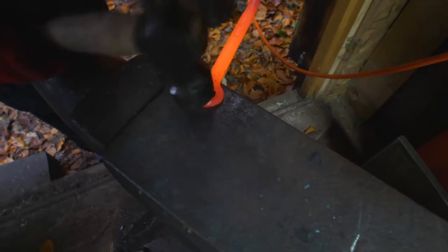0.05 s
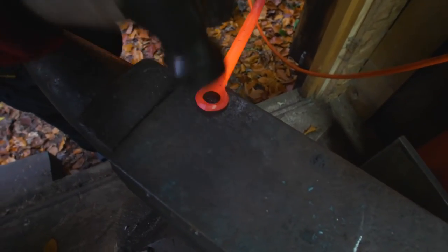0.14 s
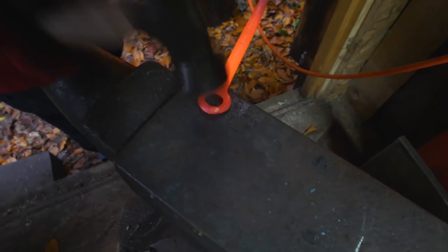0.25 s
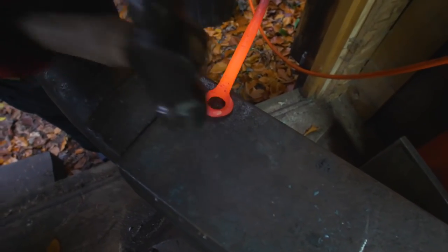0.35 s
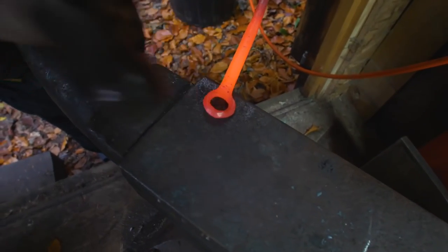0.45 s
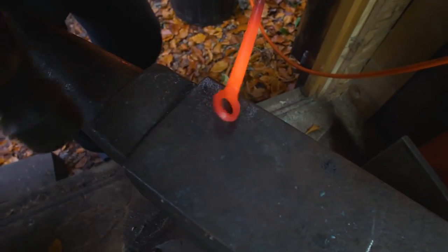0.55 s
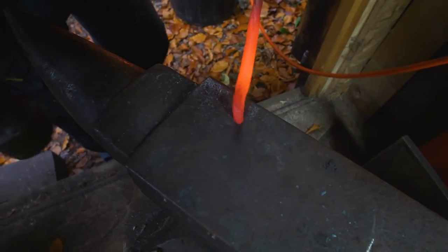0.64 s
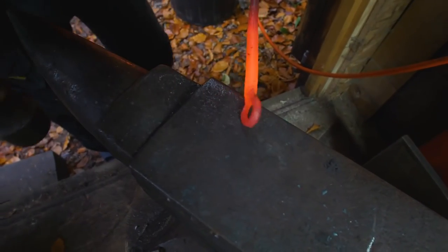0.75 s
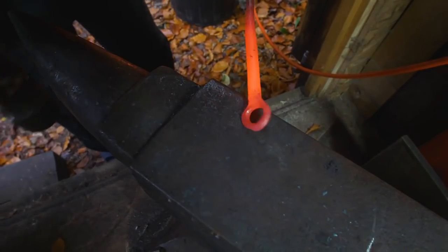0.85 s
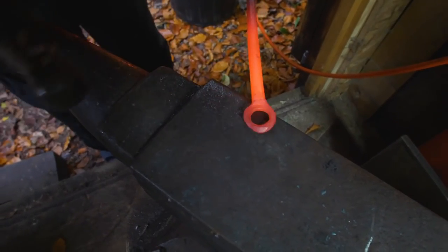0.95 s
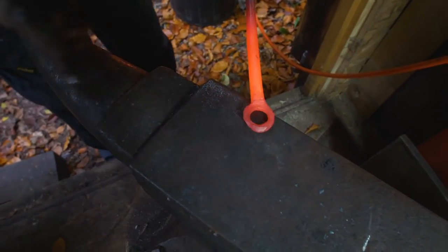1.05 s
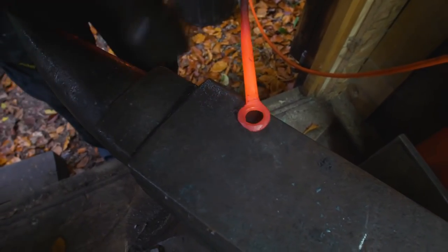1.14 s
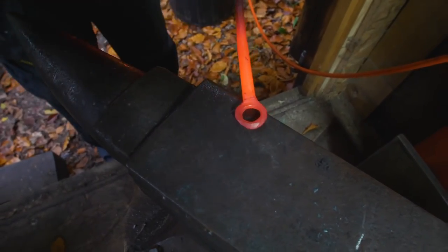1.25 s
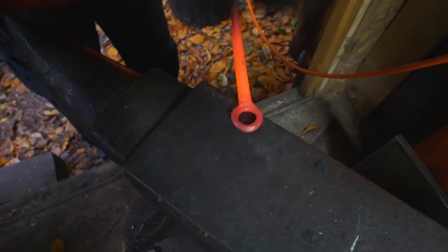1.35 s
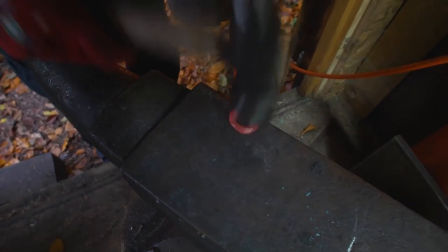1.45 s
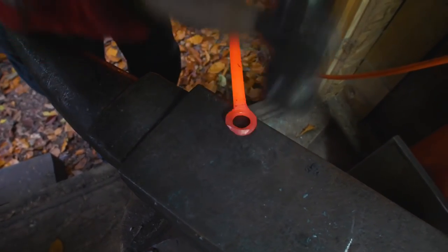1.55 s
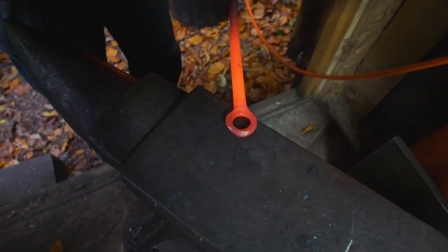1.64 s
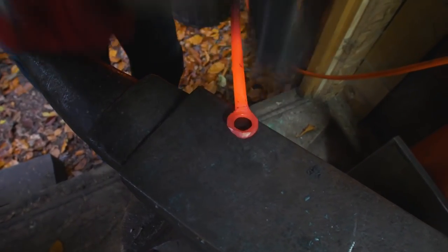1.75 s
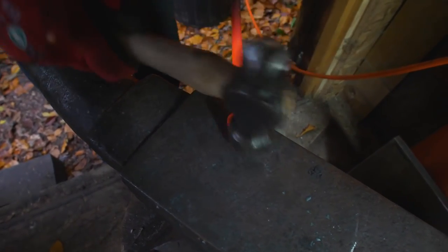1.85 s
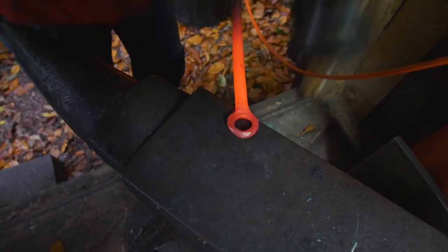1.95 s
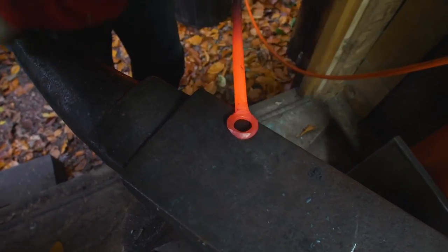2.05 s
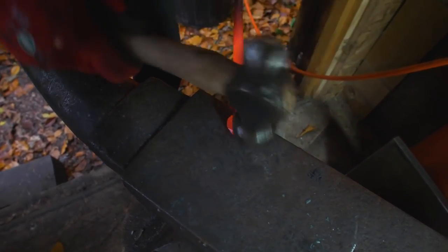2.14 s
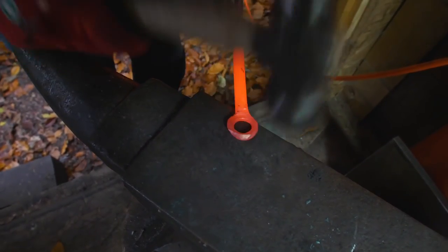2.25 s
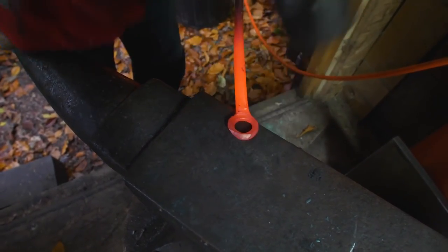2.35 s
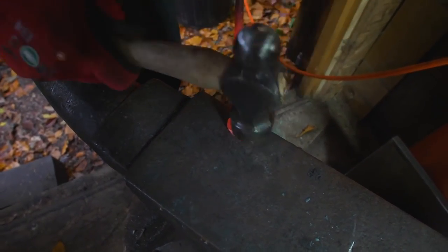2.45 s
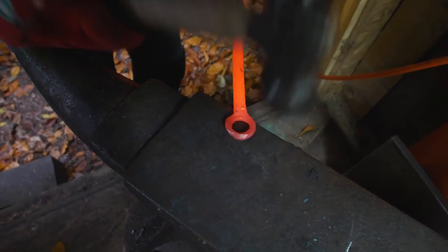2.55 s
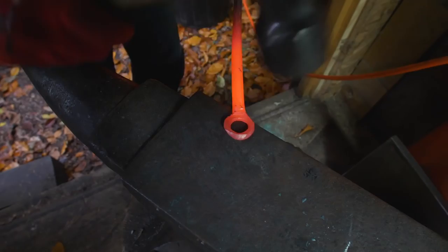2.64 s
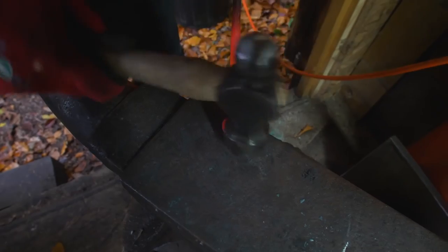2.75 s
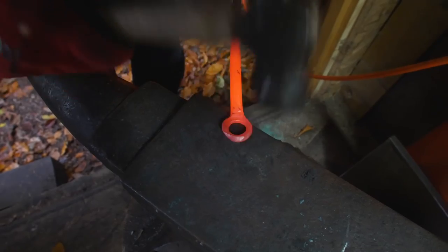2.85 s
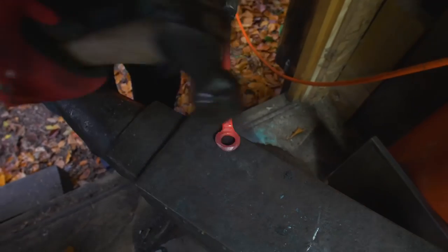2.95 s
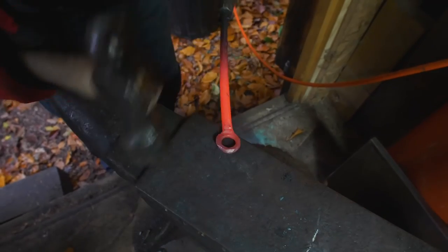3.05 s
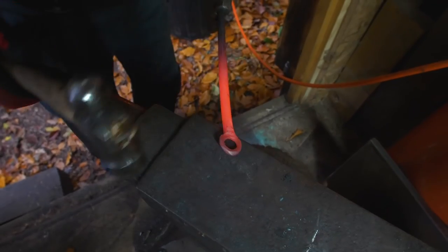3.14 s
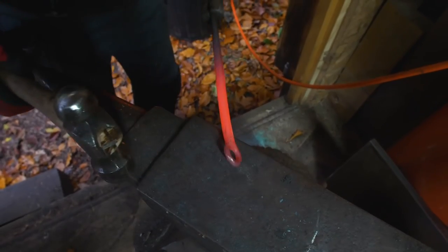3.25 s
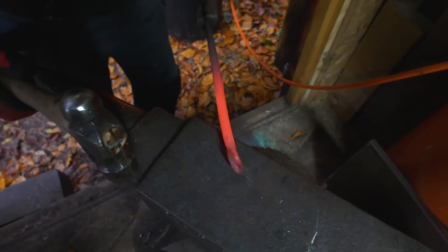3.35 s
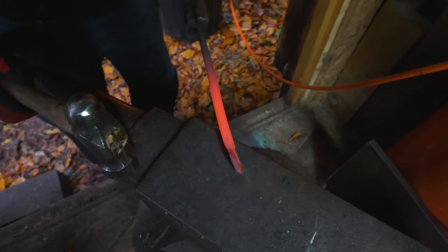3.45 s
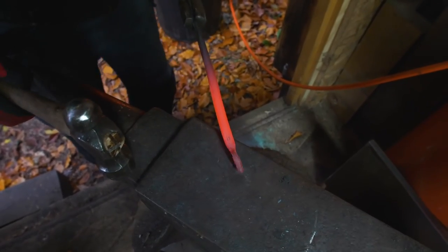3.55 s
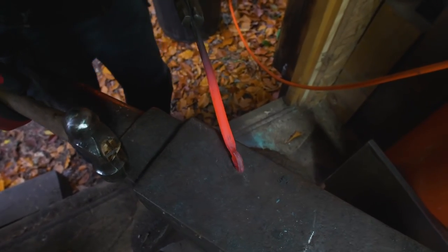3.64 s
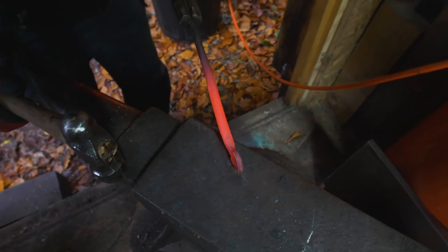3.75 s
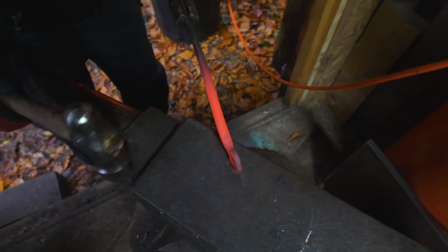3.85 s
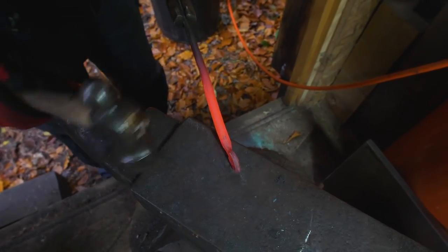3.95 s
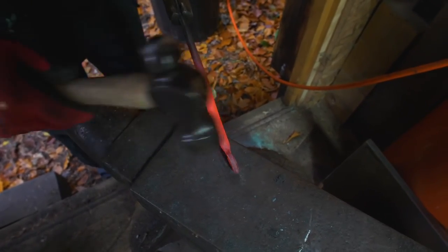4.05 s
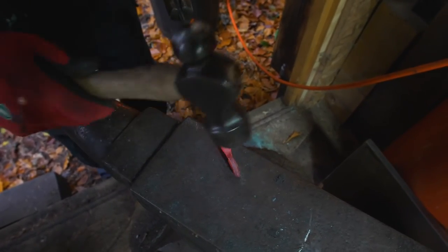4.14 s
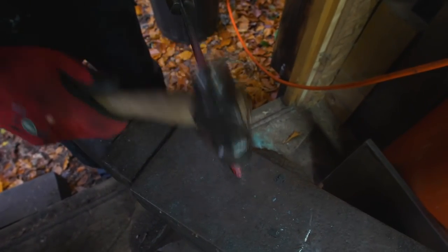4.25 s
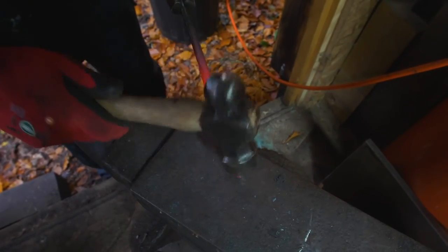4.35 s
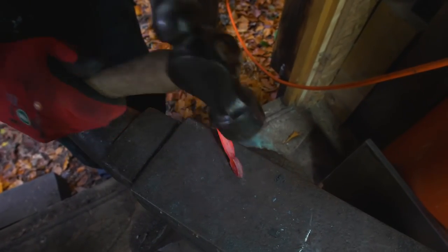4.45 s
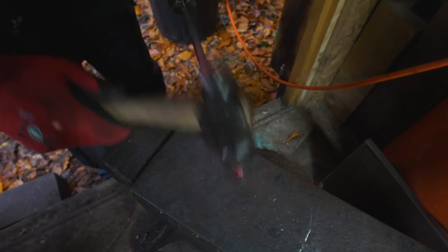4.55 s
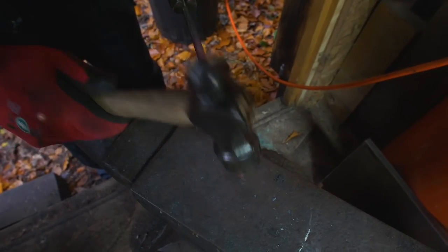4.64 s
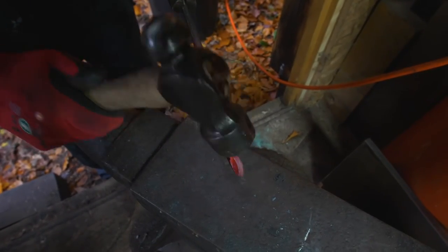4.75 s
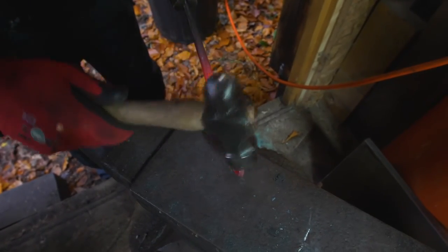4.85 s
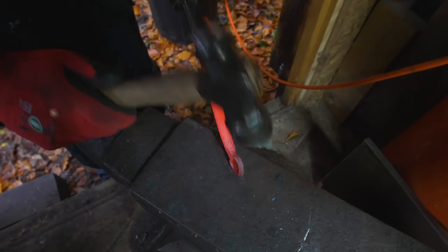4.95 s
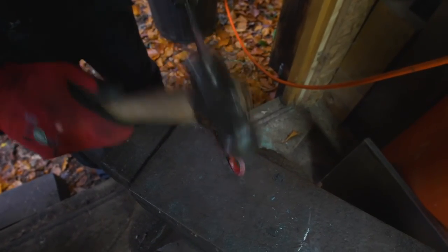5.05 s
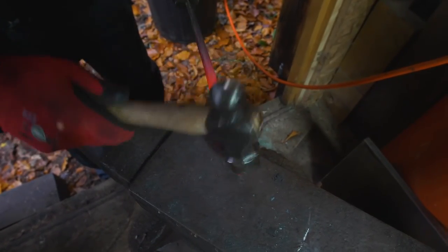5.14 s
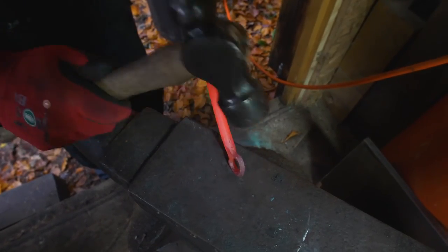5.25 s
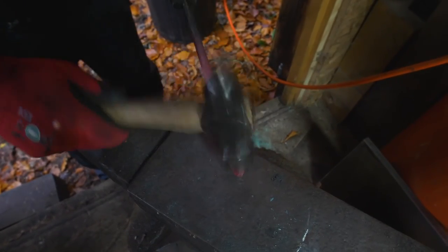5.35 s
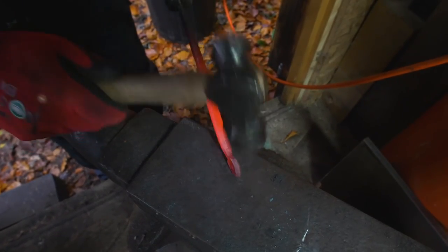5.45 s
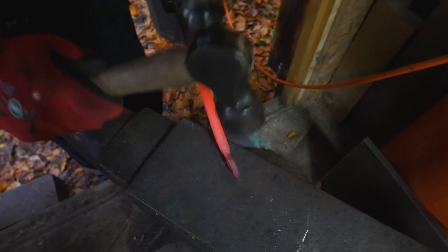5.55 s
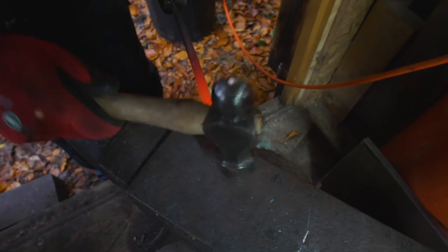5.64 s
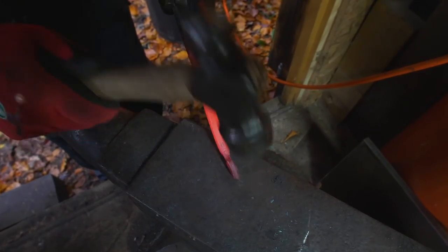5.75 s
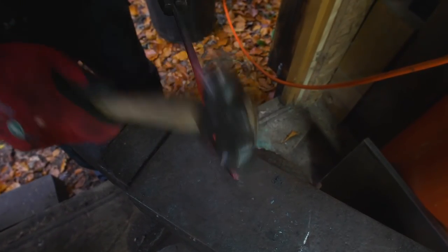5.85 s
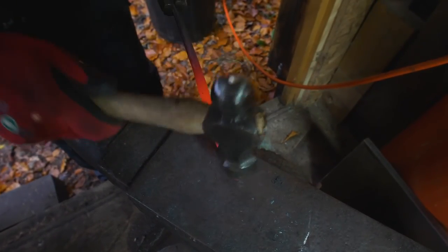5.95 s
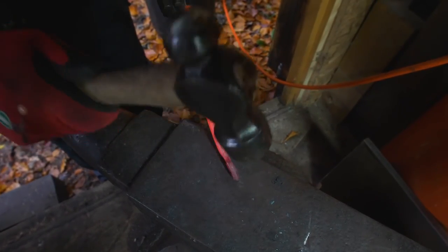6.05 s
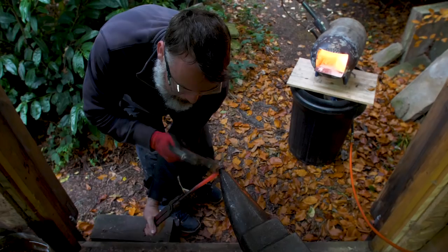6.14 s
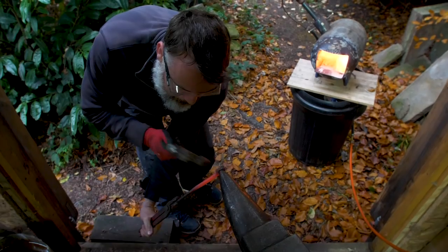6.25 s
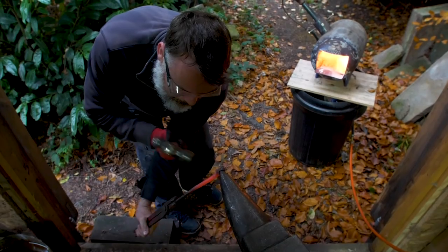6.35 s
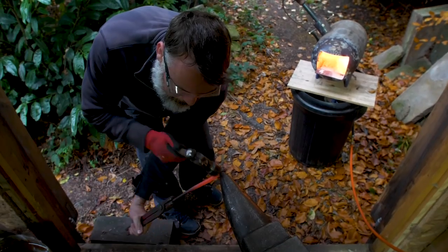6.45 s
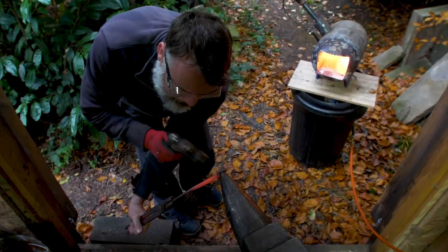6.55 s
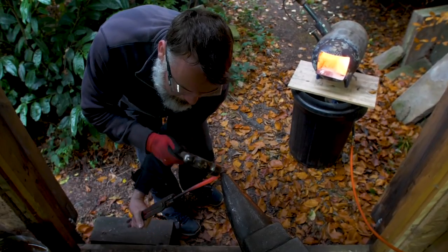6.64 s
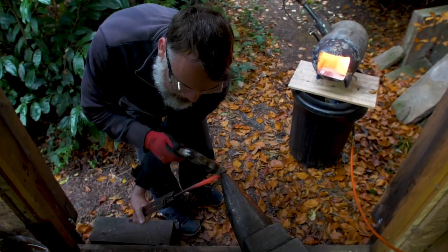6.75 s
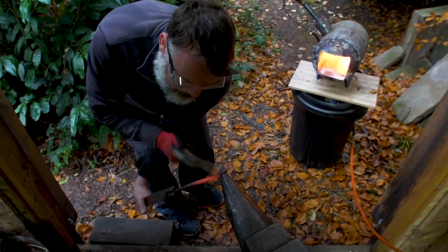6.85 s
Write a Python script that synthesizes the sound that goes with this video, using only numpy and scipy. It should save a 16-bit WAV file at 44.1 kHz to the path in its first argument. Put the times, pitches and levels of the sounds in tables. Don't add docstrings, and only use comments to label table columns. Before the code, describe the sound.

Close outdoor forging: two very loud, slightly overloaded hammer blows on hot steel, a pause with faint scraping and tong ticks, then five steady blows about a third of a second apart. After another pause, lighter, duller, quicker strikes follow, the last two somewhat more distant and echoing. Thin short anvil rings trail each blow over a low gas-forge roar.

```python
import sys
import numpy as np
from scipy import signal
from scipy.io import wavfile
from scipy.ndimage import uniform_filter1d, map_coordinates

SR = 44100
rng = np.random.default_rng(int(sys.argv[2]) if len(sys.argv) > 2 else 0)


def digitize_waveform(pressure):
    field = np.atleast_2d(pressure).T
    bounded = np.clip(field, -1, 1)
    quanta = np.round(bounded * 32767).astype(np.int16)
    wavfile.write(sys.argv[1], SR, quanta)


def volts_from_db(level):
    exponent = np.asarray(level, float) / 20
    return 10 ** exponent


N = 303849

BLOW_START_S = (0.1032, 0.332, 1.5228, 1.8588, 2.188, 2.498, 2.786, 4.3555, 4.624, 4.8847, 5.1556, 5.4195,
                5.6826, 5.9514, 6.222, 6.4747, 6.7217)
# peak_db [dB], clack_hz [Hz], body_ring_db [dB], horn_ring_db [dB], head_ring_db [dB]
BLOW_SOUNDS = [(-5, 1237, -36, -34.5, -46.5), (-6, 1335, -39.5, -33.5, -58),
               (-9.5, 1150, -53.5, -62.5, -55.5), (-9, 1237, -65.5, -52, -59),
               (-9.5, 1140, -62.5, -48, -52), (-10, 1300, -52.5, -37.5, -52.5),
               (-9.5, 1160, -72, -41.5, -57), (-14.5, 890, -64, -42.5, -67.5), (-12, 1000, -53, -50.5, -62),
               (-13, 1200, -60, -45, -54), (-12, 1180, -68.5, -39, -38.5), (-12.5, 1216, -80, -37, -46),
               (-14.5, 960, -66, -66, -51), (-13, 1190, -73, -65, -54), (-12, 1840, -72, -30.5, -70),
               (-11, 1670, -70, -27.5, -62), (-11.5, 1320, -59, -33, -61.5)]


def unit(x):
    return x / np.sqrt(np.mean(x ** 2) + 1e-20)


def along(points, hz):
    f, v = np.transpose(points)
    return np.interp(np.log(hz + 1), np.log(f + 1), v)


def add(track, s, sound):
    part = track[round(s * SR):][:len(sound)]
    part += sound[:len(part)]


def band(x, lo_hz, hi_hz):
    return signal.sosfilt(signal.butter(2, [lo_hz, hi_hz], "band", fs=SR, output="sos"), x)


def wobble(rate):
    knots = rng.standard_normal(int(N * rate / SR) + 4)
    return map_coordinates(knots, [np.arange(N) * rate / SR])


def noise(n, gain, patchy_db=0):
    hz, _, z = signal.stft(rng.standard_normal(n + 1024), SR, nperseg=1024)
    field = uniform_filter1d(rng.standard_normal(z.shape), size=7, axis=0)
    field = uniform_filter1d(field, size=5, axis=1)
    z = z * volts_from_db(patchy_db * unit(field)) * gain(hz)[:, None]
    return unit(signal.istft(z, nperseg=1024)[1][:n])


def ring(t, hz, db, t60, swell=0.000085, rough_db=0):
    waver = np.interp(t, np.arange(80) / 90, rng.standard_normal(80))
    level = volts_from_db(db - 60 * t / t60 + rough_db * waver)
    return level * (1 - np.exp(-t / swell)) * np.sin(2 * np.pi * hz * t)


def held(s, hold, swell, fade):
    late = np.arange(N) / SR - s[:, None]
    return -np.maximum(0, np.maximum(-swell * late, fade * (late - hold[:, None])))


def work(s):
    turns = (1, 3.5, 6.17)
    return int(np.searchsorted(turns, s))


def tail(n, colour, longer):
    # pitch_hz [Hz], t60_s [s]
    yard = [(200, 0.47), (700, 0.096), (2000, 0.14), (5000, 0.15), (13000, 0.12)]
    hz, t, z = signal.stft(rng.standard_normal(n), SR, nperseg=128)
    slow = volts_from_db(-60 * t / longer / along(yard, hz)[:, None])
    near = volts_from_db(11.5 - 60 * t / 0.031)
    uneven = volts_from_db(3.5 * unit(uniform_filter1d(rng.standard_normal(z.shape), size=9, axis=1)))
    z = z * (slow + near) * uneven * volts_from_db(along(colour, hz))[:, None]
    return unit(signal.istft(z, nperseg=128)[1][:n])


def hammer():
    # pitch_hz [Hz], level_db [dB], t60_s [s]
    soft_modes = [(605, -7, 0.016), (718, -3.5, 0.016), (800, 0.5, 0.018)]
    # pitch_hz [Hz], level_db [dB], t60_s [s]
    bar_modes = [(2103, 5.5, 0.014), (1687, -2.5, .015), (2300, -11, 0.018)]
    # pitch_hz [Hz], level_db [dB], t60_s [s]
    face_modes = [(3400, 8, 0.015), (3610, 0, .025), (3130, -9, .02), (4600, -14.5, .035)]
    # pitch_hz [Hz], level_db [dB], t60_s [s]
    stand_modes = [(400.6, 2.5, 0.066), (457, -11.5, 0.13), (345, -1.5, 0.033)]
    # pitch_hz [Hz], level_db [dB per Hz]
    near_colour = [(150, -40), (260, -10), (440, -4), (650, -5), (1250, -18.5), (1900, -15.5), (2600, -26),
                   (3700, -13.5), (5500, -26), (9500, -30), (13000, -37), (16000, -49.5)]
    # pitch_hz [Hz], level_db [dB per Hz]
    door_colour = [(150, -4.5), (260, -16.5), (440, -2.5), (650, -12.5), (1100, -17.5), (1650, -3.5),
                   (2400, -24), (3400, -7.5), (4800, -20), (8000, -27), (12000, -36), (16000, -40)]
    soft_levels = (-8, -10.5, 1, -24)
    face_levels = (-14, -9.5, -14.5, -6)
    # levels [dB re peak], then rise [s]
    clack_levels, bar_levels = (-2.5, -5.5, -2, -14), (-7.5, -6, -20.5, -39)
    stand_levels, thud_levels = (-14.5, -13, -9, -12.5), (-25, -23.5, -24, -18)
    crack_levels, echo_levels = (-15.5, -9, -6, -8), (-34.5, -32, -31.5, -30)
    rise_s = (.00035, .0004, .00045, .0014)

    out, t = np.zeros(N), np.arange(SR // 3) / SR
    for s, (peak_db, clack_hz, *_) in zip(BLOW_START_S, BLOW_SOUNDS):
        k = work(s)
        rise = rise_s[k]
        square_octaves = np.log2(clack_hz / 1165.7)
        clack_db = clack_levels[k] + 11 * square_octaves
        bar_db = bar_levels[k] + 26 * square_octaves
        crack_db = crack_levels[k] - 6 * square_octaves

        climb = 1 + .5 * volts_from_db(bar_db) * (1 - np.exp(-t / 0.00039))
        clack = ring(t, 0.82 * clack_hz * climb, clack_db + 14.0, 6 / clack_hz, rise)

        clang = 0
        for level, modes in ((clack_db + soft_levels[k], soft_modes), (bar_db + 0.5, bar_modes),
                             (face_levels[k] - 1, face_modes)):
            for hz, db, t60 in modes:
                hz = hz * (1 + rng.normal(0, .01))
                clang = clang + ring(t, hz, level + db + rng.normal(0, 1), t60, 3 * rise, rough_db=2)
        stand = sum(ring(t, hz, stand_levels[k] + 3 + db + rng.normal(0, 1.5), t60, swell=.002)
                    for hz, db, t60 in stand_modes)
        thud = ring(t, 175, thud_levels[k] + 7.0, 0.091, swell=.004)

        crack = volts_from_db(crack_db + 4.5 - 60 * t / 0.0068) * band(rng.standard_normal(len(t)), 5600, 11000)
        crack += volts_from_db(crack_db + 0.5 - 60 * t / 0.0057) * band(rng.standard_normal(len(t)), 11000, 16000)
        crack *= 1 - np.exp(-t / rise)

        colour, longer = (door_colour, 1.27) if k == 3 else (near_colour, 1)
        echoes = volts_from_db(echo_levels[k] + 1.5) * tail(len(t), colour, longer) * (1 - np.exp(-t / 0.00034))

        blow = clack + clang + stand + thud + crack + echoes
        overloaded = blow / (1 + np.abs(blow / 1.08) ** 6) ** (1 / 6)
        add(out, s, volts_from_db(peak_db) * overloaded)
    return band(out, 150, 18000)


def anvil():
    # pitch_hz [Hz], level_db [dB], t60_s [s], swell_s [s]
    parts = [
        [(1752, 3, 0.11, 0.0018), (1790, -6, .1, .002)],
        [(3984, 3, .42, .022)],
        [(10874, 0.5, .18, .006), (8552, -3, .17, .006), (7840, -6.5, .12, .002)],
        [(14010, 0, .17, .002), (14652, -5, .2, .002)],
        [(15032, 0, .14, .002), (15740, -8, .15, .002), (14652, -13, .2, .002), (12970, -19, .17, .002)],
        [(1095, 2, .18, .003)],
        [(1500, -0.5, 0.18, .003), (1560, -4.5, .14, .003)],
        [(1847, 1.5, .2, .003)],
        [(2034, 0.5, .18, .003), (2140, -1.5, 0.14, .003)],
        [(3295, 0, 0.2, .003), (3435, -5, .17, .003), (3600, -6, 0.12, .003)],
    ]
    # level_db [dB], t60_s [s]
    earlier = (-50, .5)
    # start_s [s], level_db [dB], t60_s [s]
    ping = (3.014, -69, .3)
    heel_levels = (-57, -51.5, -54.5, -60)
    cheek_levels = (4, 5, -18.5, -5)
    hum_levels = [(-48.5, -44.5, -41, -53), (-37, -43.5, -52.5, -32.5), (-34.5, -42, -54, -36.5),
                  (-34, -37, -44.5, -43), (-34, -42, -54.5, -34)]

    body_hz = parts[1][0][0]
    before_first = np.arange(N) < BLOW_START_S[0] * SR
    out = ring(np.arange(N) / SR + 0.00063, body_hz, *earlier) * before_first
    ends = [*BLOW_START_S[1:], N / SR]
    for s, end, (peak_db, _, body_db, horn_db, head_db) in zip(BLOW_START_S, ends, BLOW_SOUNDS):
        k = work(s)
        levels = [horn_db, body_db, peak_db + heel_levels[k], head_db + cheek_levels[k], head_db]
        levels += [peak_db + hum[k] + rng.normal(0, 2.5) for hum in hum_levels]
        t = np.arange(round((end - s) * SR)) / SR
        for level, part in zip(levels, parts):
            for hz, db, t60, swell in part:
                rough_db = 4.5 * (1800 < hz < 3700) + 2.5 * (hz < 1800)
                add(out, s, ring(t, hz, level + db + rng.normal(0, 1), t60, swell, rough_db))
    add(out, ping[0], ring(np.arange(SR // 2) / SR, body_hz, *ping[1:]))
    return out


def tongs():
    # start_s [s], peak_db [dB], low_ring_db [dB]
    ticks = [(0.701, -65, 6), (0.82, -58, 0), (0.8766, -46.5, -16), (3.8064, -63.5, -6), (4.0238, -61, -13),
             (4.0611, -55, -19.5), (4.0867, -57, -14), (4.1265, -56.5, -16.5), (4.168, -69, -1)]
    # pitch_hz [Hz], level_db [dB], t60_s [s]
    jaw_modes = [(3900, -3, .03), (4780, -9, .03), (6250, -8, .03), (6756, -6, .04), (7004, -7, .04),
                 (7768, -8, .03), (8829, -5, .04), (9302, -6, .04), (11790, -13, .03), (12170, -6, .045)]
    # start_s [s], hold_s [s], squeak_db [dB], rasp_db [dB]
    turning = [(2.01, .13, -99, -82), (3.22, .07, -92, -90), (3.298, .06, -76, -89),
               (3.386, .016, -78, -90)]

    out, t = np.zeros(N), np.arange(SR // 8) / SR
    for s, peak_db, low_db in ticks:
        jaws = sum(ring(t, hz, db + rng.normal(0, 2.3), t60) for hz, db, t60 in jaw_modes)
        snap = volts_from_db(4 - 60 * t / 0.012) * band(rng.standard_normal(len(t)), 2800, 4600)
        low = ring(t, 3138, low_db + 1.5, .04, rough_db=4)
        add(out, s, volts_from_db(peak_db) * (volts_from_db(-16) * jaws + snap + low))

    s, hold, squeak_db, rasp_db = np.transpose(turning)
    shape_db = held(s, hold, swell=450, fade=1100)
    squeak = noise(N, lambda f: 1 / (1 + ((f - 3138) / 30) ** 2), patchy_db=1.5)
    rasp = noise(N, lambda f: 1 / (1 + ((f - 6450) / 250) ** 2), patchy_db=10.5)
    out += volts_from_db(squeak_db[:, None] + shape_db).sum(axis=0) * squeak
    return out + volts_from_db(rasp_db[:, None] + shape_db).sum(axis=0) * rasp


def taps():
    # start_s [s], peak_db [dB], dull_part_db [dB]
    clicks = [(0.5412, -51.5, -17), (0.8914, -54, 5), (0.922, -55, 1), (1.7187, -57, -14.5),
              (1.7302, -60, -21), (1.7494, -72, -1), (2.3444, -55.5, -6.5), (2.3544, -64, -13),
              (2.3694, -67, -1), (2.647, -71, -4), (2.6556, -56.5, -12), (2.6694, -61, -6),
              (2.69, -64.5, -5), (2.93, -56.5, -13), (2.9408, -55, -15), (2.9494, -78, 12),
              (2.9834, -59.5, -1.5), (3.004, -59, -4), (3.6894, -74, 8), (4.7344, -68, -2),
              (5.2694, -64, 4), (6.42, -71, 14.5)]
    # pitch_hz [Hz], level_db [dB], t60_s [s]
    knock = (2.4375, [(980, -39.5, 0.014), (1780, -55, .07), (3100, -55, .025), (3750, -56, .015)])
    out, t = np.zeros(N), np.arange(SR // 8) / SR
    for s, peak_db, dull_db in clicks:
        click = band(rng.standard_normal(len(t)), 2500, 12000) * volts_from_db(-60 * t / 0.0035)
        dull = band(rng.standard_normal(len(t)), 600, 1930) * volts_from_db(dull_db + 13.5 - 60 * t / 0.042)
        add(out, s, volts_from_db(peak_db - 6.0) * (click + dull))
    add(out, knock[0], sum(ring(t, *mode) for mode in knock[1]))
    return out


def scuffs():
    # start_s [s], length_s [s], level_db [dB]
    rubs = [(0.457, 0.043, -71.5), (0.527, .07, -70), (0.63, 0.018, -78), (0.814, 0.063, -68.5),
            (0.86, 0.056, -68), (0.91, 0.02, -68), (1.72, 0.041, -89), (2.34, 0.027, -81.5),
            (2.42, .012, -79), (2.645, 0.033, -87), (2.925, .03, -90.5), (3.246, 0.12, -87.5),
            (6.886, 0.0087, -68)]
    out = np.zeros(N)
    for s, length, db in rubs:
        n = round(length * SR)
        uneven = uniform_filter1d(rng.standard_normal(n), size=60) * 60 ** .5
        grit = rng.standard_normal(n) * volts_from_db(3.5 * uneven)
        add(out, s, volts_from_db(db) * np.sqrt(np.hanning(n)) * unit(band(grit, 2300, 14000)))
    return out


def rustling():
    # start_s [s], hold_s [s], level_db [dB]
    rustles = [(.45, 0.94, -80), (0.704, 0.26, -84), (1.997, 0.066, -88), (2.83, 0.056, -85.5),
               (3.056, 0.11, -95.5), (3.257, 0.076, -86.5), (6.32, .06, -91.5)]
    s, hold, db = np.transpose(rustles)
    return volts_from_db(db[:, None] + held(s, hold, swell=120, fade=100)).sum(axis=0)


def forge():
    # start_s [s], flame_db [dB], jet_in_open_view_db [dB]
    burner = [(0.0, -46, -65.5), (0.31, -48, -64), (0.5, -48, -69), (1.11, -45.5, -64.5),
              (1.34, -47.5, -68), (1.84, -50.5, -74), (2.03, -52.5, -68.5), (2.7, -52, -74),
              (3.13, -58, -79), (3.43, -56, -82.5), (3.87, -51.5, -79), (4.16, -50.5, -78.5),
              (4.76, -52, -77), (5.03, -52, -76.5), (6.06, -52.5, -79), (6.24, -52, -74),
              (6.35, -53.5, -72), (6.89, -51.5, -68)]
    # pitch_hz [Hz], level_db [dB per Hz]
    roar_colour = [(15, -61.5), (25, -37.5), (57, -19.5), (133, -6.5), (199, -8.5), (253, 2), (323, -2.5),
                   (386, -23.5), (426, -10), (477, -20.5), (534, -18), (957, -32), (1200, -38.5),
                   (1560, -64.5), (2640, -120)]
    # pitch_hz [Hz], level_db [dB per Hz]
    jet_colour = [(350, -24), (600, -8.5), (1060, -15.5), (1400, -7.5), (1590, -11), (1970, -9),
                  (2650, -16), (3050, -12.5), (3960, -11), (5100, -23), (5600, -27), (7280, -47.5),
                  (12300, -120)]
    # pitch_hz [Hz], level_db [dB per Hz]
    fizz_colour = [(2940, -33.5), (5000, -4.5), (5290, -3), (6250, 5.5), (9720, -12), (11100, -3),
                   (13700, -6.5), (15800, -11), (16200, -22), (16500, -31), (16800, -39)]
    # pitch_hz [Hz], width_hz [Hz], level_db [dB re jet]
    whistles = [(1370, 120, -18), (1940, 70, -17), (3620, 130, -12), (3860, 50, -17), (7270, 60, -26),
                (11300, 500, -28)]

    s, *columns = np.transpose(burner)
    flame_db, open_db = [np.interp(np.arange(N) / SR, s, column) for column in columns]
    flutter = wobble(4.0)
    roar = noise(N, lambda hz: volts_from_db(along(roar_colour, hz)), patchy_db=1)
    roar *= volts_from_db(flame_db + 1 + 1.5 * flutter)

    jet = noise(N, lambda hz: volts_from_db(along(jet_colour, hz)), patchy_db=1.33)
    for hz, width, db in whistles:
        whistle = noise(N, lambda f: 1 / (1 + (2 * (f - hz) / width) ** 2))
        jet += volts_from_db(db + 1.8 * wobble(3.3)) * whistle
    jet *= volts_from_db(open_db - 1.5 + 1.8 * flutter)

    fizz_db = -95.5 + .7 * (open_db - open_db.mean())
    stir = rustling()
    fizz = noise(N, lambda hz: volts_from_db(along(fizz_colour, hz)), patchy_db=0.7)
    fizz *= (volts_from_db(fizz_db) + stir) * volts_from_db(1.1 * wobble(28))
    swish = noise(N, lambda hz: volts_from_db(along(jet_colour, hz)) * (hz > 900), patchy_db=3.0)
    return roar + jet + fizz + stir * volts_from_db(8) * swish


def scene_changes():
    # start_s [s], level_db [dB]
    steps = [(3.014, -53), (6.1746, -45)]
    out = np.zeros(N)
    for s, db in steps:
        add(out, s, volts_from_db(db) * np.exp(-np.arange(400) / SR / .0006))
    return out


def scene():
    return (hammer() + anvil() + tongs() + taps() + scuffs() + forge())[None]


def top_cut(x):
    return signal.sosfilt(signal.butter(12, 17070, fs=SR, output="sos"), x)


def record(dry):
    top = signal.ellip(8, .5, 70, 16400, fs=SR, output="sos")
    mix = signal.sosfilt(top, dry + scene_changes())
    return top_cut(mix)


dry = scene()
out = record(dry)
digitize_waveform(out)
```